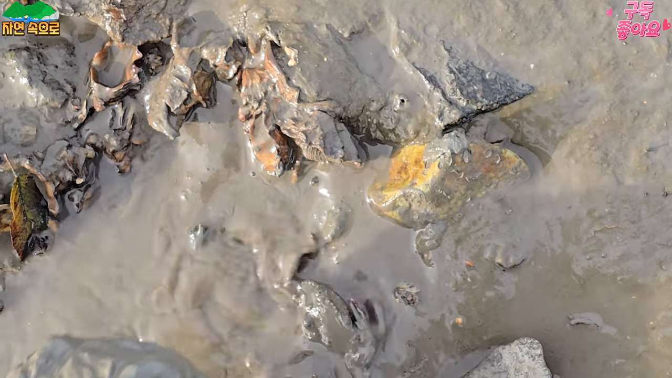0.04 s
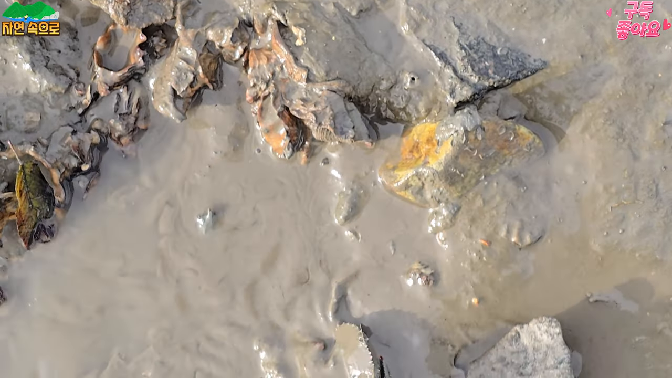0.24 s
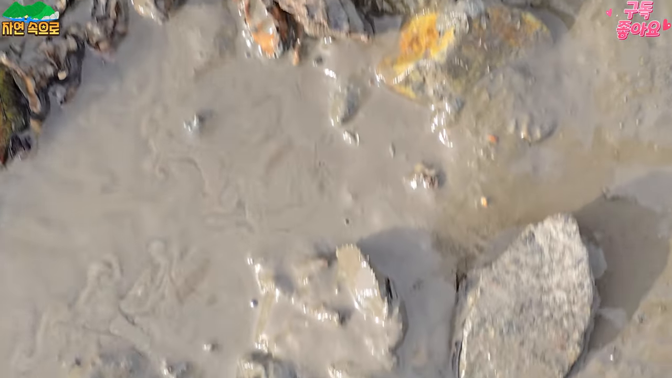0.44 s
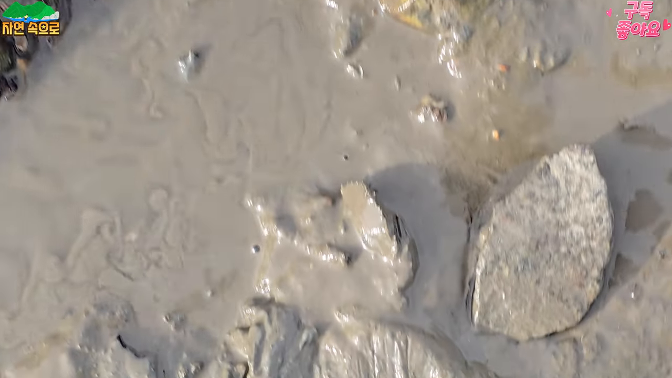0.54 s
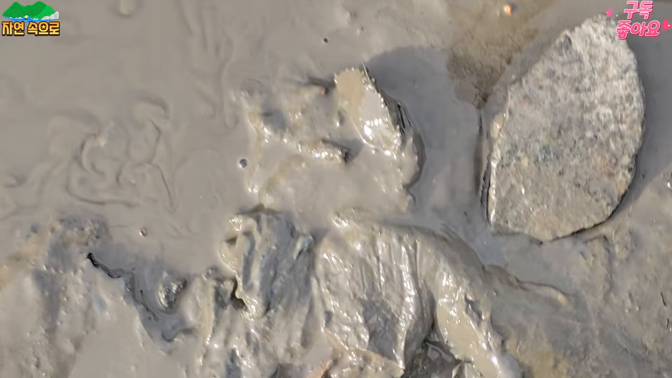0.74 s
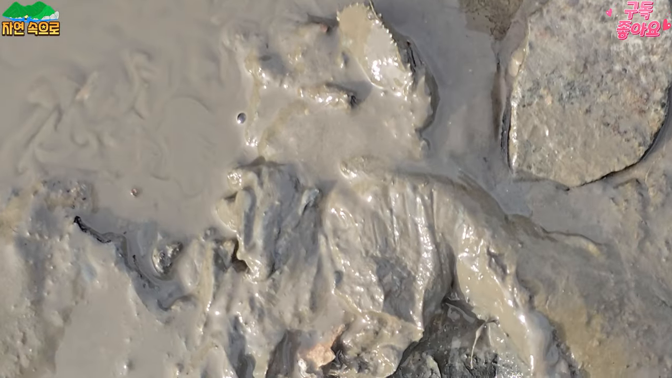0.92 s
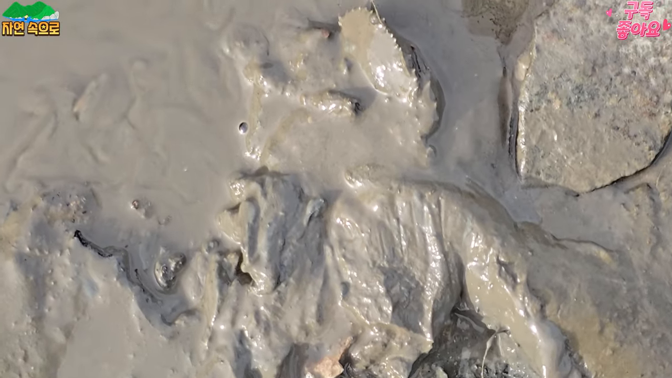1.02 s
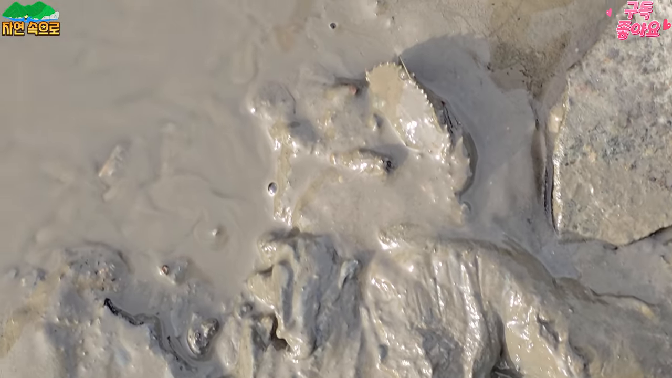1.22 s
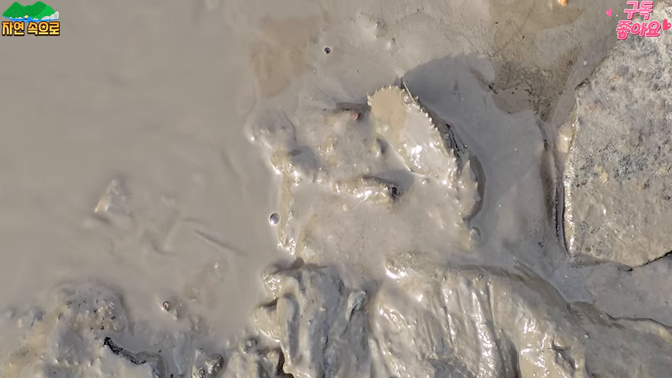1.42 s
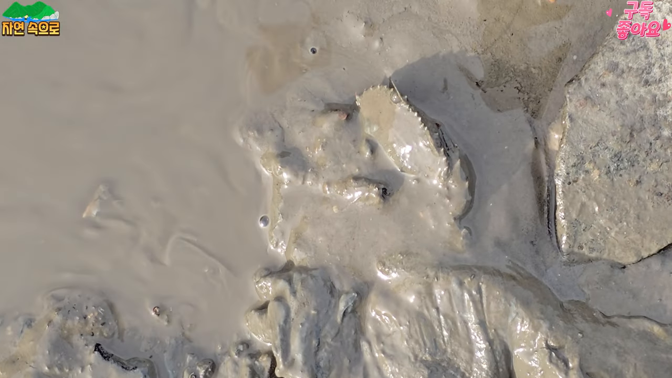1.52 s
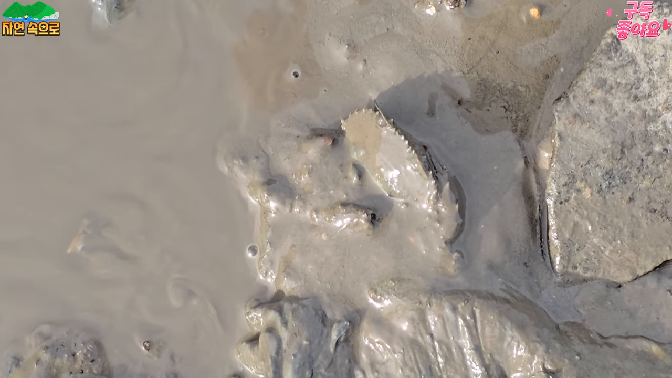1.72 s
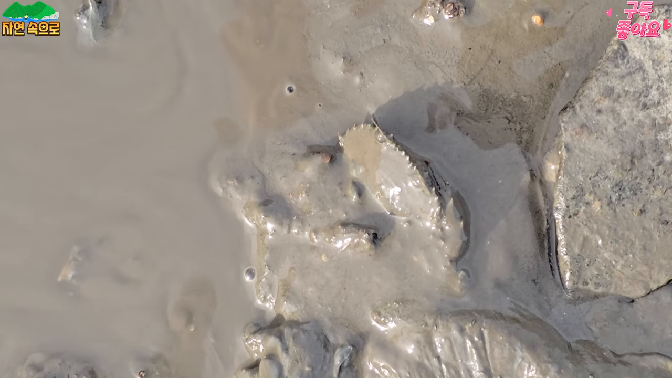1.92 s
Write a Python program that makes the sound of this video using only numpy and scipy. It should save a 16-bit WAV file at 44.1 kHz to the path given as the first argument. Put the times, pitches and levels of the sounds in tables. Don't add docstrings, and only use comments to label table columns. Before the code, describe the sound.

Wet tidal mud seeping with a fine crackling hiss, sharp shell clicks and rough microphone bumps

```python
import sys
import numpy as np
from scipy import signal
from scipy.fft import rfft, irfft
from scipy.io import wavfile
from scipy.ndimage import uniform_filter1d

SR = 44100
rng = np.random.default_rng(int(sys.argv[2]) if len(sys.argv) > 2 else 0)


def transcribe(u):
    v = np.clip(np.atleast_2d(u).T, -1, 1)
    q = np.round(v * 32767).astype(np.int16)
    wavfile.write(sys.argv[1], SR, q)


def convert_level_to_amplitude(level_db):
    exponent = np.asarray(level_db, float) / 20
    return 10 ** exponent


N = 88200

# frequency in Hz, level in dB.
RIGHT = [(45, -16.5), (130, -11), (400, -6.5), (1500, -6.5), (2700, -14.5), (4800, -6.5), (6300, -20.5),
         (7800, -40.5)]
# frequency in Hz, level in dB.
RIGHT_TOP = [(8300, -54.5), (10300, -46.5), (11500, -30.5), (14000, -27.5), (15800, -31.5), (16400, -47)]


def evened(x):
    return x / np.sqrt(np.mean(x ** 2) + 1e-20)


def read(points, hz):
    f, value = np.transpose(points)
    return np.interp(np.log(hz + 1), np.log(f + 1), value)


def add(mix, s, sound):
    part = mix[..., max(round(s * SR), 0):][..., :sound.shape[-1]]
    part += sound[..., :part.shape[-1]]


def coloured(x, shape_db):
    hz = np.fft.rfftfreq(len(x), 1 / SR)
    return evened(irfft(rfft(x) * convert_level_to_amplitude(shape_db(hz)), len(x)))


def low_hum(noise, centre_hz, width_hz):
    return coloured(noise, lambda hz: -10 * np.log10(1 + ((hz - centre_hz) / width_hz) ** 4))


def blurred_noise(shape, bins, frames):
    over_pitch = uniform_filter1d(rng.standard_normal(shape), size=bins, axis=1)
    return evened(uniform_filter1d(over_pitch, size=frames, axis=2))


def fizz():
    pops_per_s, range_db = 500, 4.5
    strength = convert_level_to_amplitude(range_db * np.minimum(rng.exponential(1, (2, N)), 2.5))
    pops = strength * (rng.random((2, N)) < pops_per_s / SR)
    tick = rng.standard_normal(80) * np.exp(-np.arange(80) / 20)
    return evened(signal.oaconvolve(pops, tick[None])[:, :N])


def seep():
    # time in seconds, left level in dB, right level in dB,
    # left brightness and right brightness (about -1 to 1, no unit).
    seep_drift = [(0, -48, -37.5, 0.8, 0.38), (0.198, -32, -38, -0.69, 0.7), (.42, -41.5, -48, 0.41, 1),
                  (.46, -47, -35.5, 0.75, 1), (.55, -36, -37, 0.3, 0.89), (.68, -37.5, -36, 1.17, 0.43),
                  (.85, -34, -36, 0.42, -0.028), (1.05, -37, -34, -0.11, -0.36),
                  (1.35, -40, -41, -0.18, -0.33), (1.5, -33.5, -39, 0.65, -0.32),
                  (1.678, -41, -38.5, 0.87, -0.68), (2, -39, -38.5, 0.8, -0.7)]
    # frequency in Hz, level in dB.
    left_tone = [(45, -50), (130, -10.5), (300, -1), (1200, -7), (3000, -15), (4800, -24.5), (5800, -44),
                 (16000, -56.5)]
    # frequency in Hz, likeness from 0 to 1.
    likeness = [(60, 0.26), (300, 0.96), (640, 0.56), (1400, 0.0089)]
    fizz_db, patch_db, flicker_db, bright_db_per_oct = -10, 2.5, 2, 4

    raw = rng.standard_normal((2, N)) + convert_level_to_amplitude(fizz_db) * fizz()
    hz, t, z = signal.stft(raw, SR, nperseg=512, noverlap=384)
    same = np.clip(read(likeness, hz), -1, 1)[:, None]
    z = np.array([z[0], same * z[0] + np.sqrt(1 - same ** 2) * z[1]])
    patches = blurred_noise(z.shape, 5, 14)
    flicker = blurred_noise(z.shape, 50, 3)

    s, *columns = np.transpose(seep_drift)
    left_db, right_db, left_up, right_up = (np.interp(t, s, c) for c in columns)
    tilt_db = np.log2(np.clip(hz, 70, 16000) / 1000)[:, None] * bright_db_per_oct
    left_hz = hz[:, None] * 2 ** (-0.45 * left_up * (hz[:, None] > 1200))
    left = read(left_tone, left_hz) + left_db + tilt_db * left_up
    right = read(RIGHT + RIGHT_TOP, hz)[:, None] + right_db + tilt_db * right_up
    z = z * convert_level_to_amplitude(np.array([left, right]) + 8.5 + patch_db * patches + flicker_db * flicker)
    return signal.istft(z, SR, nperseg=512, noverlap=384)[1][:, :N]


def rumble():
    # time in seconds, left level in dB.
    rumble_level = [(0, -27), (.17, -22), (.43, -24), (.476, -63), (1.17, -82), (1.23, -25.5), (1.47, -25),
                    (1.52, -55), (2, -57)]
    right_db, right_fade_db_per_s = -9, 51
    t = np.arange(N) / SR
    low = np.array([low_hum(v, 36, 19.4) for v in rng.standard_normal((2, N))])
    left = np.interp(t, *np.transpose(rumble_level))
    right = left + right_db - right_fade_db_per_s * np.minimum(t, 0.5)
    return low * convert_level_to_amplitude([left, right])


def surf():
    # time in seconds, level in dB.
    surf_level = [(0, -58), (.7, -64), (1.1, -57.5), (1.55, -54), (1.65, -45.5), (2, -47.5)]
    level_db = np.interp(np.arange(N) / SR, *np.transpose(surf_level))
    return low_hum(rng.standard_normal(N), 105.4, 36.5) * convert_level_to_amplitude(level_db)


def clicks():
    # time in seconds, peak level in dB, ring pitch in Hz, left minus right in dB.
    click_list = [(.024, -24.5, 4670, -22), (.057, -15.5, 4950, -38), (.074, -26.5, 3600, -17),
                  (.1475, -23.5, 4700, -22), (.181, -25, 4560, -23), (.194, -23.5, 4500, -20),
                  (.2738, -13, 1200, 18), (.285, -16.5, 5210, -32), (0.4485, -9, 1444, -7),
                  (0.4498, 2.5, 4740, -36), (0.4526, -7, 1915, -10), (0.4526, -9, 4300, -30),
                  (0.459, -14.5, 4400, -26), (0.4623, -15, 4700, -24), (0.4658, -15, 5340, -27),
                  (0.47, -21, 4570, -24), (.476, -19.5, 2000, -10.5), (.485, -21, 3900, -21),
                  (0.4494, -5, 3770, -34), (.5265, -21.5, 1000, 26), (.631, -22, 1810, 9.5),
                  (.643, -33, 4300, -11), (0.6479, -18.5, 2120, 3), (0.649, -29, 4100, 3),
                  (0.6529, -15, 2100, 7), (0.6531, -16.5, 5380, -17), (.657, -5, 2200, 13),
                  (.6565, -13.5, 4200, 4), (0.6601, -6.5, 2300, 6), (0.659, -16, 4360, -8),
                  (.6655, -19, 2280, 4), (.669, -22, 4400, -8), (0.6716, -17, 2360, 11),
                  (0.675, -20.5, 2950, 11), (.675, -25, 4160, -8), (.6782, -4, 4050, 25),
                  (.6787, -2, 5420, -15), (.6785, -15.5, 4250, -25), (.7475, -25, 2900, 20),
                  (.768, -15, 5550, -32), (.768, -15.5, 7500, -13.5), (.981, -38, 7100, -21),
                  (1.229, -28.5, 650, 15), (1.4443, -5.5, 3300, 33), (1.462, -12, 3860, 22),
                  (1.4917, 7, 4000, 34), (1.69, -32, 7360, 9), (1.7665, -31, 626, 3)]
    rise_s, ring_s, blunt = 0.0011, 0.0015, 1.57
    left_lag_s, left_lead_s = 0.0005, 0.0002
    out, t = np.zeros((2, N)), np.arange(600) / SR
    rise = np.sin(np.pi / 2 * np.minimum(t / rise_s, 1)) ** 2
    for s, db, hz, pan_db in click_list:
        hurry = np.sqrt(hz / 3000) * (3 if pan_db > 20 else 1)
        fade = np.exp(-(t / ring_s * hurry) ** blunt)
        ring = 2 * rise * fade * np.sin(2 * np.pi * hz * t)
        left_delay = left_lag_s if pan_db < 0 else -left_lead_s
        add(out[0], s + left_delay, convert_level_to_amplitude(db + min(pan_db, 0)) * ring)
        add(out[1], s, convert_level_to_amplitude(db - max(pan_db, 0)) * ring)
    return out


def spray():
    # time in seconds, peak level in dB, centre frequency in Hz.
    spray_list = [(0.057, -36.5, 13400), (.148, -27.5, 13300), (.362, -35.5, 13500), (0.451, -19, 13300),
                  (.459, -21, 13300), (.627, -25, 15000), (.650, -23, 12300), (.656, -21.5, 14800),
                  (.669, -27.5, 11400), (.779, -29, 13500), (.785, -24.5, 10000), (.982, -33, 9900),
                  (.992, -43, 14000), (1.097, -44, 12400)]
    snap_s, slope_db_per_oct = 0.00079, 45
    out, t = np.zeros((2, N)), np.arange(600) / SR
    swell = t / snap_s * np.exp(-t / snap_s)
    for s, db, centre_hz in spray_list:
        hiss = coloured(rng.standard_normal(600),
                        lambda hz: -slope_db_per_oct * abs(np.log2((hz + 1) / centre_hz)))
        add(out, s, convert_level_to_amplitude(db + np.array([[-18], [0]])) * swell * hiss)
    return out


def splashing():
    splash_db, splash_s, gap_s, notch_db = -13, 0.004, 0.0011, 30
    out, t = clicks() + spray(), np.arange(600) / SR
    tail = rng.standard_normal((2, 600)) * np.exp(-t / splash_s) * (t > gap_s)
    tail = tail / np.linalg.norm(tail[0])
    out = out + convert_level_to_amplitude(splash_db) * signal.oaconvolve(out, tail, axes=1)[:, :N]
    port_db = np.minimum(read(RIGHT[2:] + RIGHT_TOP, np.fft.rfftfreq(N, 1 / SR)) + notch_db, 0)
    return np.array([out[0], irfft(rfft(out[1]) * convert_level_to_amplitude(port_db), N)])


def rubs():
    # start in seconds, length in seconds, level in dB, centre in Hz, edge in seconds.
    rub_list = [
        (.424, 0.05, -31, 3000, 0.0081),
        (.573, .18, -30.5, 2970, 0.092),
        (.662, 0.032, -30, 2660, 0.0079),
        (.793, 0.067, -36.5, 2530, .013),
        (1.42, .03, -38, 2330, .015),
        (1.4432, .048, -25.5, 3490, 0.00055),
        (1.4, 0.027, -37, 3200, .004),
        (1.578, .026, -31, 370, 0.0044),
        (1.452, 0.036, -26, 560, .008),
        (.138, 0.017, -35, 1050, 0.0038),
    ]
    # frequency in Hz, level in dB.
    rub_tone = [(300, 4), (900, 4), (3000, 16), (5500, 3.5), (8000, -14.5), (12000, -23.5), (15000, -52)]
    out, t = np.zeros(N), np.arange(8192) / SR
    for s, length, db, centre_hz, edge in rub_list:
        noise, grit = rng.standard_normal((2, 8192))
        grain = noise * convert_level_to_amplitude(1.3 * evened(uniform_filter1d(grit, size=60)))
        stroke = np.clip(np.minimum(t, length - t) / edge, 0, 1)
        add(out, s, convert_level_to_amplitude(db) * stroke * coloured(grain, lambda hz: read(rub_tone, hz * 3000 / centre_hz)))
    return out * convert_level_to_amplitude([[0], [-26]])


def gusts():
    # centre in seconds, length in seconds, level in dB, dullness in dB.
    gust_list = [
        (.21, 0.029, -20, 11),
        (.231, 0.013, -7, 6),
        (.276, 0.0034, -13, 4.5),
        (.332, .045, -12.5, 11),
        (.42, 0.027, -21, 7.5),
        (1.19, 0.061, -29, 11),
        (1.255, 0.057, -28.5, 18),
        (1.39, 0.055, -25, 17),
        (1.468, 0.045, -21, 5.5),
    ]
    knee_hz = 198
    out, t = np.zeros(N), np.arange(-4096, 4096) / SR
    for s, length, db, fall_db in gust_list:
        air = coloured(rng.standard_normal(8192),
                       lambda hz: -fall_db * np.log2((hz + 20) / knee_hz) ** 2 / 3.45)
        add(out, s - 4096 / SR, convert_level_to_amplitude(db) * np.exp(-(2 * t / length) ** 2) * air)
    return np.array([out, np.zeros(N)])


def pushes():
    # time in seconds, peak level in dB, pitch in Hz, direction (sign and size, no unit).
    push_list = [(0.2204, -12, 300, 0.75), (0.2261, 1.5, 224, -0.96), (0.2293, -1, 151, 0.96),
                 (.233, 4.5, 343, -1.12), (0.2371, 12, 91.3, 1), (0.2443, 8, 55.4, -1.06),
                 (0.259, 3, 36, 0.96), (.2742, -1.5, 300, -0.93), (0.2749, -3, 900, 1),
                 (0.2763, 2, 318, 0.98), (0.284, -5, 90, -1), (0.305, -10, 40, 1), (0.3227, -1, 211, -1.02),
                 (.3248, -5.5, 333, 1), (0.33, -2, 100, -0.72), (.3325, 1, 300, 1), (.339, -1.5, 80, 0.79),
                 (0.3445, -10, 101, 1), (.357, -7, 49.8, -1.1), (0.3753, -5.5, 45, 1), (.416, -6.5, 183, 1),
                 (.424, -8, 108, 1), (1.1633, -17, 237, -1.1), (1.167, -21, 238, -1.1),
                 (1.181, -5.5, 241, 1), (1.1859, -12, 180, 1), (1.1933, -6, 230, 0.97),
                 (1.2051, -13.5, 250, -0.74), (1.2074, -2, 219, 0.96), (1.22, -15, 70, 0.95),
                 (1.2504, -11, 301, -1), (1.252, -13, 300, 0.92), (1.259, -15.5, 70, 0.93),
                 (1.269, -15, 297, -1.02), (1.282, -15.5, 50, -0.84), (1.299, -14, 33, 0.79),
                 (1.333, -17.5, 46, -1.1), (1.385, -4, 204, -1.06), (1.393, -6.5, 71, 1),
                 (1.407, -10, 152, -1), (1.4443, -4, 700, -0.84), (1.4463, 1.5, 258, 0.96),
                 (1.449, -7.5, 302, -1.2), (1.457, -10, 400, 1), (1.4603, -8, 120, -0.92),
                 (1.469, -12.5, 110, 1)]
    push_cycles = 0.4
    out, t = np.zeros((2, N)), np.arange(N) / SR
    for s, db, hz, way in push_list:
        cycles = (t - s) * hz
        out[0] += way * convert_level_to_amplitude(db) * np.exp(-(cycles / push_cycles) ** 2) * np.cos(2 * np.pi * cycles)
    return out


def bubbles():
    # start in seconds, level in dB, pitch in Hz, length in seconds.
    bubble_list = [
        (.62, -40.5, 233, .04),
        (0.676, -32.5, 323, 0.043),
        (.69, -38.5, 478, 0.044),
        (.70, -42, 827, 0.035),
        (.825, -39, 222, 0.074),
        (.92, -43, 846, .03),
        (1.035, -44, 398, .025),
        (1.759, -39.5, 287, 0.058),
        (1.792, -42, 318.6, 0.069),
    ]
    rise, left_db = 0.047, -5
    out = np.zeros((2, N))
    for s, db, hz, length in bubble_list:
        t = np.arange(0, length, 1 / SR)
        swell = np.sin(np.pi * (t / length) ** 0.45)
        tone = swell * np.sin(2 * np.pi * hz * t * (1 + rise * t / length))
        add(out, s, convert_level_to_amplitude(db + np.array([[left_db], [0]])) * tone)
    return out


def scene():
    return seep() + rumble() + surf() + splashing() + rubs() + gusts() + pushes() + bubbles()


def top_cut(x):
    return signal.sosfilt(signal.butter(12, 16660, fs=SR, output="sos"), x)


def record(dry):
    full = np.array([np.clip(dry[0], -1, 1), dry[1]])
    low_pass = signal.firwin(511, 16300, window=("kaiser", 9), fs=SR)
    mix = signal.oaconvolve(full, low_pass[None], "same")
    return top_cut(mix)


dry = scene()
out = record(dry)
transcribe(out)
```